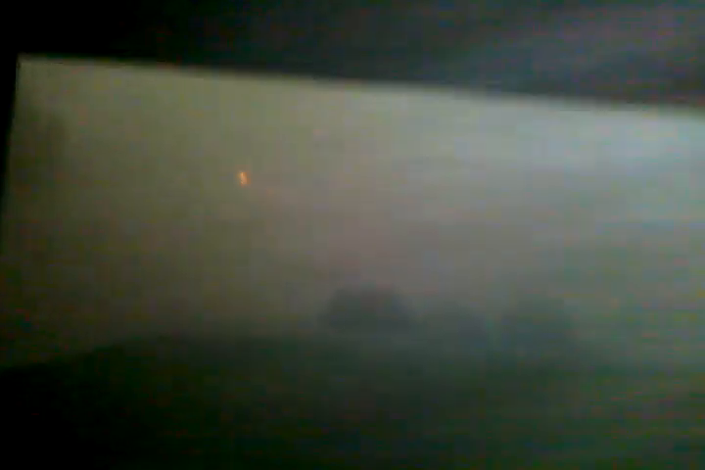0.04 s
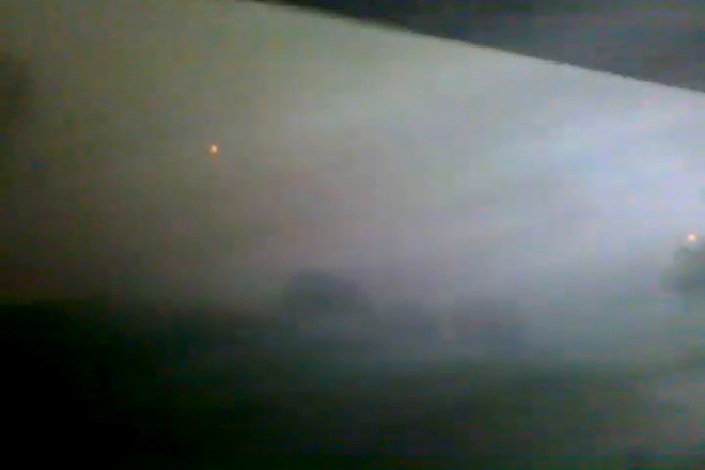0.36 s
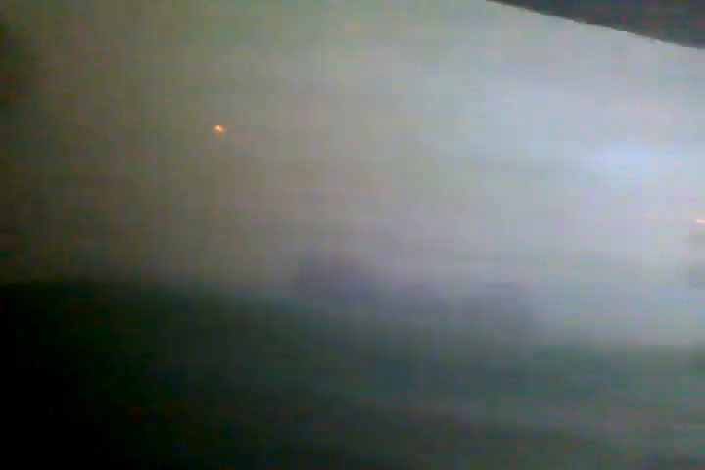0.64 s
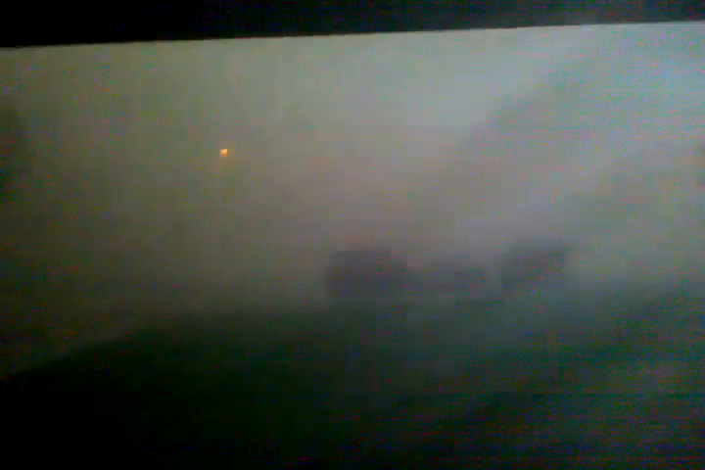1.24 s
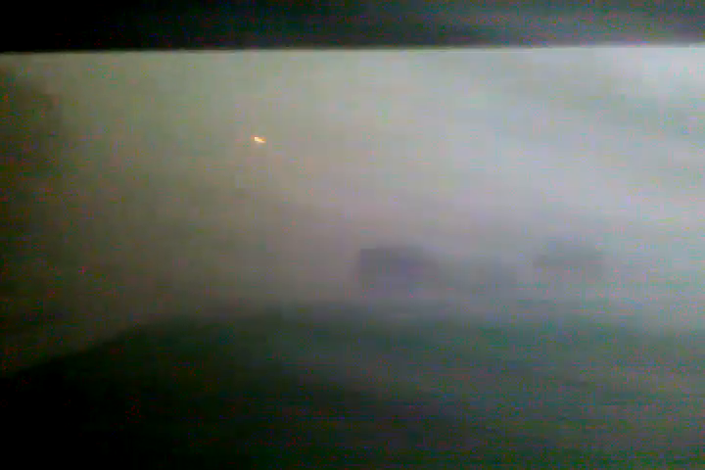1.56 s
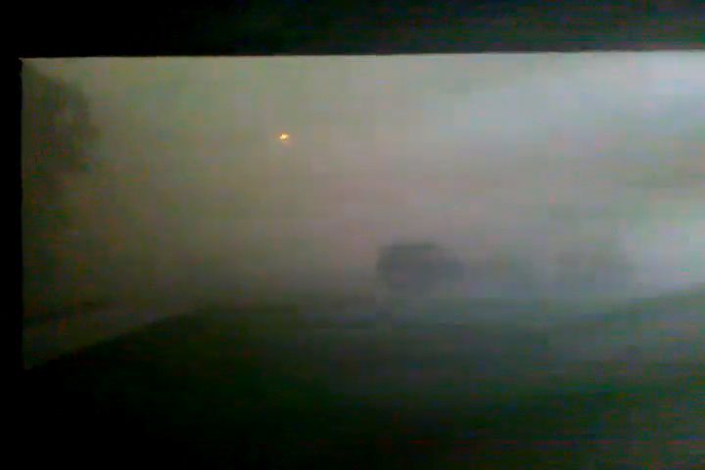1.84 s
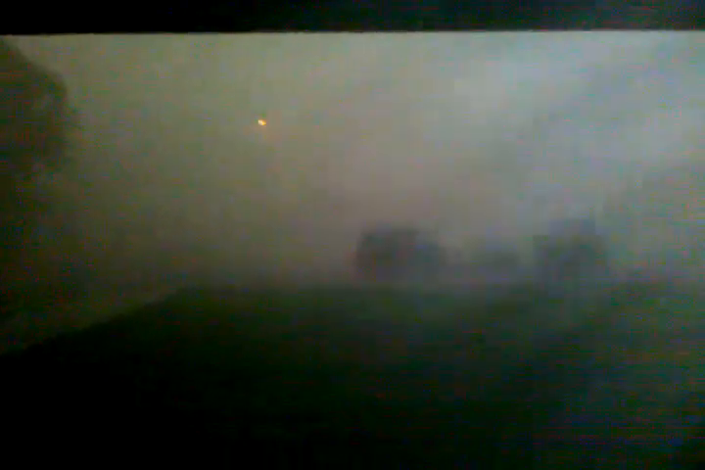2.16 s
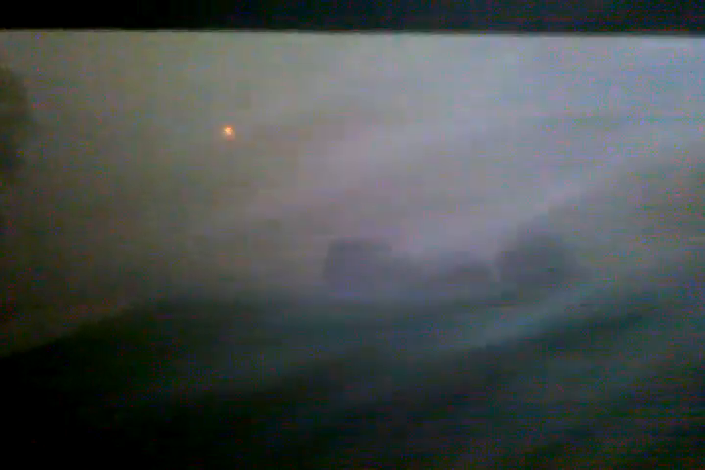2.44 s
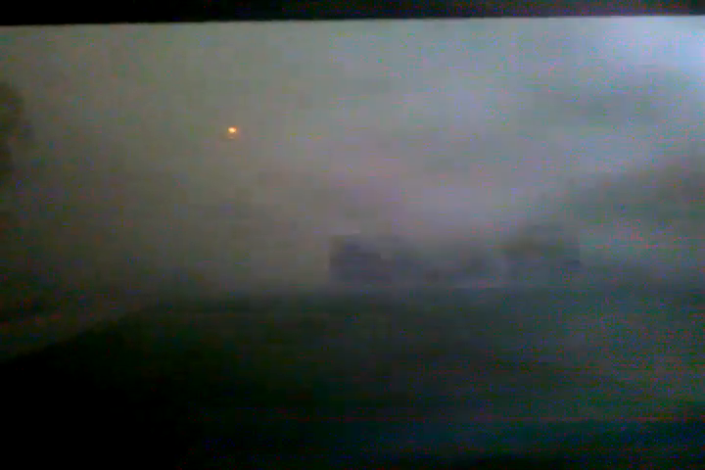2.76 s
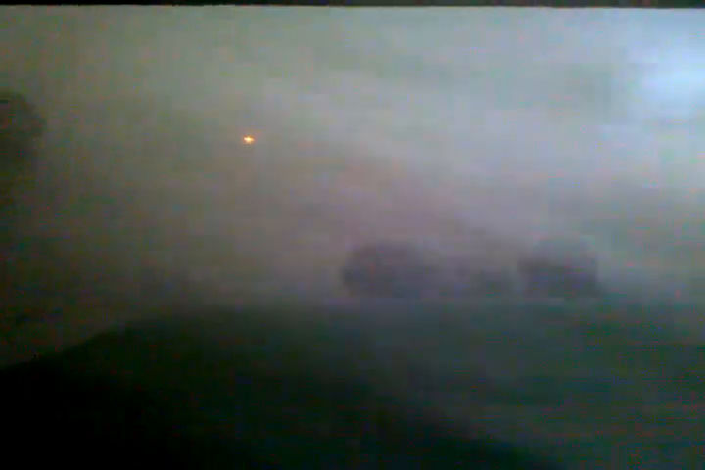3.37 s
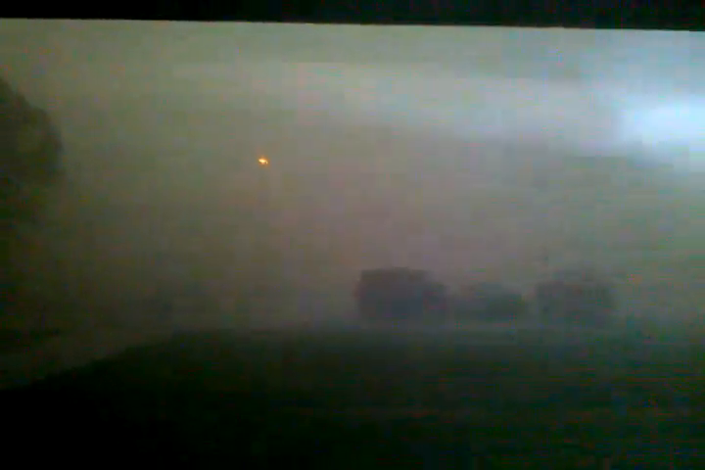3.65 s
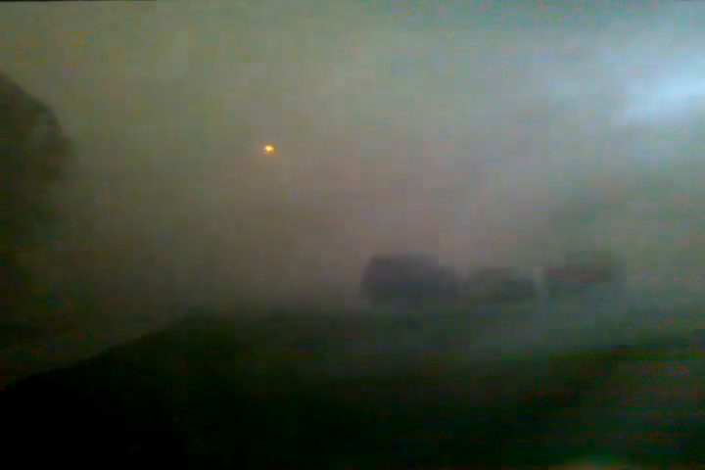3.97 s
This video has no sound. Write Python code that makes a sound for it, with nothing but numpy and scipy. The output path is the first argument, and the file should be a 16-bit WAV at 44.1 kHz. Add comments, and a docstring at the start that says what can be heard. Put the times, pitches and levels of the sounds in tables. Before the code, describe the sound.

A dense gale blows through a dust storm outdoors, a broad rush with fine hiss on top. Short low bumps of air hit the small microphone in the first half and return faintly near the end as the wind builds.

```python
"""A gale roars over open ground in a dust storm, heard from a vehicle's shelter via one small microphone.
A broad rush of air past nearby edges runs above it; the hiss of blown dust swells as the wind builds.
Eddies reach the microphone as a low flutter and as short, soft thumps.
Each steady layer is shaped noise with random patches; each thump is a pressure swing in churning air."""
import sys
import numpy as np
from scipy import signal
from scipy.fft import rfft, irfft
from scipy.io import wavfile

SR = 44100
rng = np.random.default_rng(int(sys.argv[2]) if len(sys.argv) > 2 else 0)


def transcribe(signal):
    """Save signal, clipped to [-1, 1], as a 16-bit WAV file at the path in sys.argv[1]."""
    frames = np.atleast_2d(signal).T
    limited = np.clip(frames, -1, 1)
    pcm = np.round(limited * 32767).astype(np.int16)
    wavfile.write(sys.argv[1], SR, pcm)


N = 176400

# gale strength: t/s, level/dB
GALE_DB = [(0, -2.5), (.45, -4), (1, -3.5), (1.6, -1.56), (2.05, -0.6), (2.4, .2), (2.8, .5), (3.15, -0.2),
           (3.55, 1.15), (3.8, -0.7), (4, -0.6)]
# mid-treble rush: t/s, level/dB
RUSH_DB = [(0, -37.5), (.45, -36), (.9, -34.5), (1.25, -35.5), (2.1, -37), (2.8, -36.5), (3.55, -36),
           (4, -37)]
# turbulence at the microphone: t/s, level/dB
FLUTTER_DB = [(0, -40.5), (.24, -40), (.42, -43), (.58, -39), (.75, -42), (.9, -40), (1, -44), (1.17, -35),
              (1.33, -43), (1.8, -43.5), (2.15, -48.5), (2.6, -55.5), (2.98, -50), (3.12, -42),
              (3.3, -49.5), (3.47, -41.5), (3.7, -48), (4, -54)]
# eddies hitting the microphone: t/s, swing peak level/dB, f/Hz
EDDIES = [(.208, -19, 165), (.289, -26, 140), (0.344, -25.5, 200), (0.504, -29, 140), (.542, -25, 220),
          (0.631, -27, 140), (0.639, -21, 190), (.838, -24.5, 210), (1.131, -22.5, 160), (1.145, -21, 230),
          (1.19, -24, 170), (1.223, -23, 149), (1.323, -27.5, 191), (1.536, -24, 188), (1.547, -15.5, 250),
          (1.594, -24.5, 240), (3.13, -27, 230), (3.425, -28.5, 160), (3.492, -27, 200), (3.567, -25, 125)]
# noise spectra: f/Hz, relative level/dB
ROAR_SPECTRUM = [(25, -66), (70, -28.5), (105, -9.5), (155, 2), (300, -0.46), (490, 0.1), (700, -2.5),
                 (1250, -6), (2000, -10.5), (4000, -20.5), (9000, -37)]
RUSH_SPECTRUM = [(200, -26), (600, -6.5), (1200, -1), (2000, -1.2), (3300, 0.5), (4400, -1), (5500, -2),
                 (9300, -7), (10000, -58.5)]
DUST_SPECTRUM = [(800, -26.5), (2000, -15), (3500, -7), (4500, -4), (5200, -1.5), (6000, 0.1), (6700, 1.5),
                 (9300, -0.5), (10000, -59.5)]
FLUTTER_SPECTRUM = [(15, -72), (28, -45.5), (50, -23), (90, -3), (140, 1.5), (220, -5), (350, -11),
                    (600, -23), (2000, -48)]
# microphone treble response: f/Hz, level/dB
MIC_RESPONSE = [(6800, 0.5), (7100, -6.5), (7500, -20.5), (7800, -30), (8050, -36), (8700, -34),
                (9150, -44.5)]

HOP_SAMPLES, FRAME_SAMPLES = 128, 1024


def amp(db):
    """dB to gain."""
    return 10 ** (np.asarray(db) / 20)


def unit_rms(x):
    """Scale to rms 1."""
    return x / np.sqrt(np.mean(x ** 2) + 1e-20)


def over_hz(spectrum, f_hz):
    """Spectrum in dB, interpolated over log frequency."""
    knots_hz, level_db = np.transpose(spectrum)
    return np.interp(np.log(f_hz + 1), np.log(knots_hz), level_db)


def over_time(curve):
    """Curve interpolated at every sample."""
    return np.interp(np.arange(N) / SR, *np.transpose(curve))


def add(mix, start_s, sound):
    """Mix a sound in at start_s."""
    part = mix[max(round(start_s * SR), 0):][:len(sound)]
    part += sound[:len(part)]


def patches(shape, span_s, span_hz):
    """Smooth random hills over frequency and time, rms 1."""
    cycles_per_hz = np.fft.fftfreq(shape[0], SR / FRAME_SAMPLES)[:, None]
    cycles_per_s = np.fft.fftfreq(shape[1], HOP_SAMPLES / SR)
    blur = np.exp(-(cycles_per_hz * span_hz) ** 2 - (cycles_per_s * span_s) ** 2)
    white = np.fft.fft2(rng.standard_normal(shape))
    return unit_rms(np.fft.ifft2(white * blur).real)


def airflow(spectrum, patch_db, patch_s, patch_hz):
    """Turbulent coloured noise with patches that come and go, rms 1."""
    framing = dict(nperseg=FRAME_SAMPLES, noverlap=FRAME_SAMPLES - HOP_SAMPLES)
    frames = signal.stft(rng.standard_normal(N), **framing)[2]
    patch_gain = amp(patch_db * patches(frames.shape, patch_s, patch_hz))
    patchy = signal.istft(frames * patch_gain, **framing)[1][:N]
    colour = amp(over_hz(spectrum, np.fft.rfftfreq(N, 1 / SR)))
    return unit_rms(irfft(rfft(patchy) * colour, N))


def roar(base_db=-35.5, db_per_gale_db=0.9):
    """Body of the gale over ground and trees."""
    gain = amp(base_db + db_per_gale_db * over_time(GALE_DB))
    return gain * airflow(ROAR_SPECTRUM, patch_db=1.0, patch_s=0.12, patch_hz=350)


def rush():
    """Air tearing past nearby edges, with its own swells."""
    return amp(over_time(RUSH_DB)) * airflow(RUSH_SPECTRUM, patch_db=0.58, patch_s=0.21, patch_hz=600)


def dust(base_db=-33, db_per_gale_db=1.28):
    """Fine hiss of blown dust, rising with the gale."""
    gain = amp(base_db + db_per_gale_db * over_time(GALE_DB))
    return gain * airflow(DUST_SPECTRUM, patch_db=0.55, patch_s=0.09, patch_hz=700)


def flutter():
    """Lumpy low noise of air moving over the microphone."""
    gain = amp(over_time(FLUTTER_DB))
    return gain * airflow(FLUTTER_SPECTRUM, patch_db=2.1, patch_s=0.038, patch_hz=500)


def thumps(half_width_cycles=0.32, churn_db=-17.5, churn_s=0.011, highpass_hz=68):
    """Each eddy: one quick pressure swing inside a brief churn of air."""
    pressure = np.zeros(N)
    turbulence = airflow(FLUTTER_SPECTRUM, patch_db=1, patch_s=0.03, patch_hz=500)
    half_samples = SR // 16
    t_s = np.arange(-half_samples, half_samples) / SR
    for (centre_s, level_db, f_hz), phase_cycles in zip(EDDIES, rng.random(len(EDDIES))):
        cycles = f_hz * t_s
        swing = np.sin(2 * np.pi * (cycles + phase_cycles)) / (1 + (cycles / half_width_cycles) ** 2)
        swing /= abs(swing).max()
        local_air = np.roll(turbulence, half_samples - round(centre_s * SR))[:len(t_s)]
        churn = amp(churn_db) * np.exp(-abs(t_s) / churn_s) * local_air
        add(pressure, centre_s - half_samples / SR, amp(level_db) * (swing + churn))
    highpass = signal.butter(4, highpass_hz, "high", fs=SR, output="sos")
    return signal.sosfilt(highpass, pressure)


def scene():
    """All wind at one microphone, both channels equal."""
    return np.tile(roar() + rush() + dust() + flutter() + thumps(), (2, 1))


def record(dry):
    """Microphone treble roll-off, then band limit."""
    mic_gain = amp(over_hz(MIC_RESPONSE, np.fft.rfftfreq(2 * N, 1 / SR)))
    dull = irfft(rfft(dry, 2 * N) * mic_gain)[:, :N]
    lowpass = signal.firwin(1023, cutoff=9200, window=("kaiser", 9), fs=SR)
    return signal.oaconvolve(dull, lowpass[None], "same")


dry = scene()
out = record(dry)
transcribe(out)
```